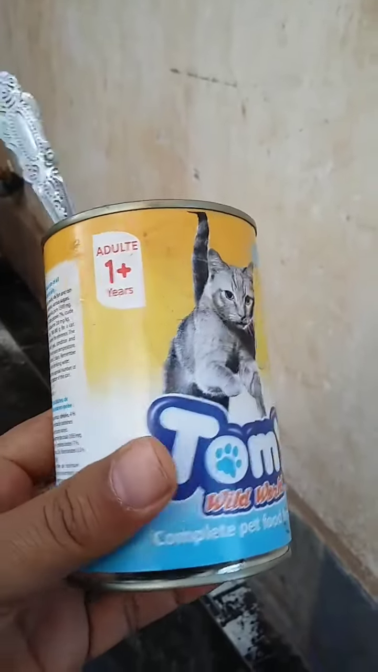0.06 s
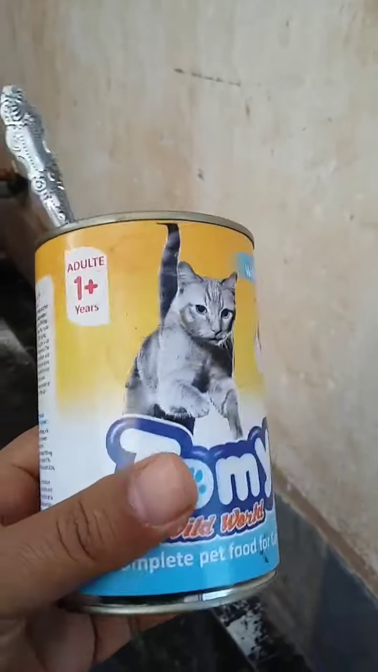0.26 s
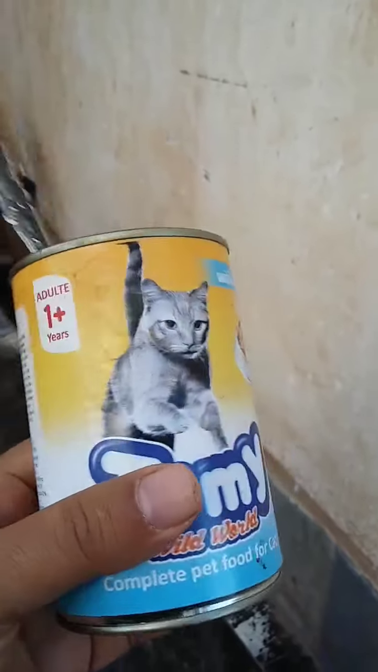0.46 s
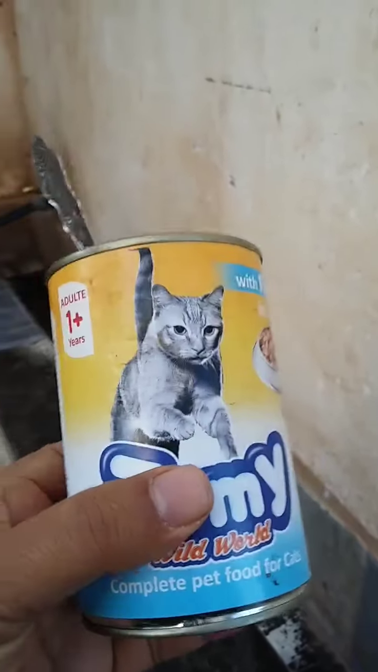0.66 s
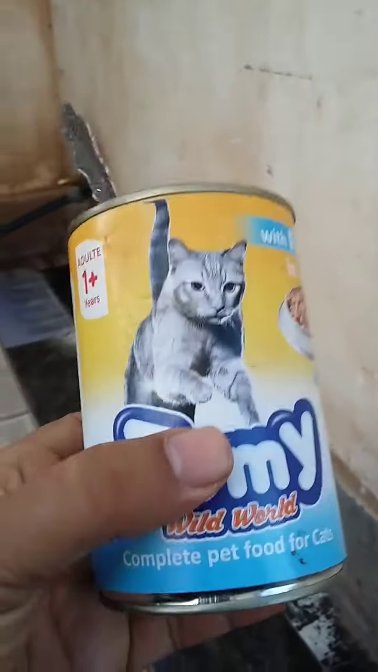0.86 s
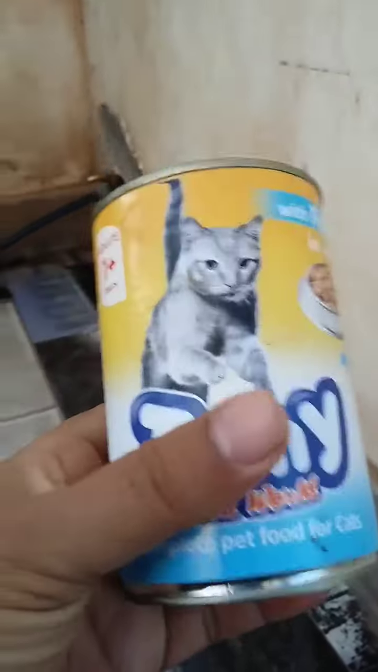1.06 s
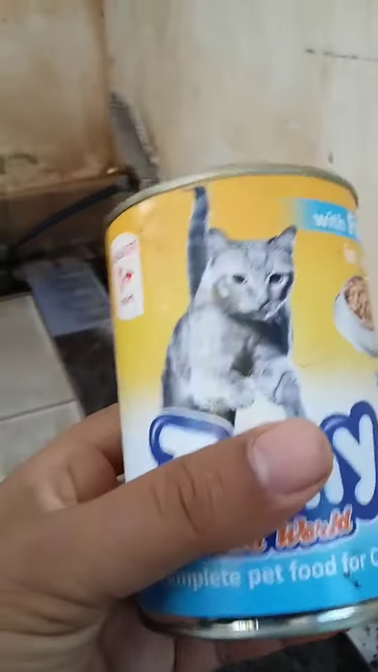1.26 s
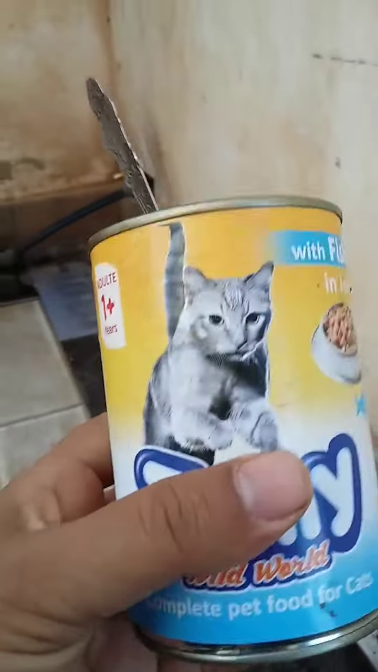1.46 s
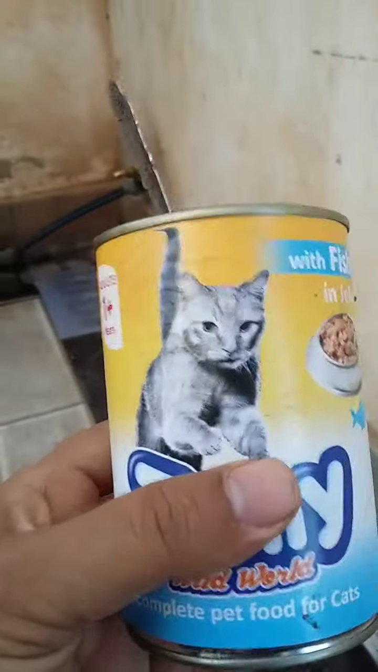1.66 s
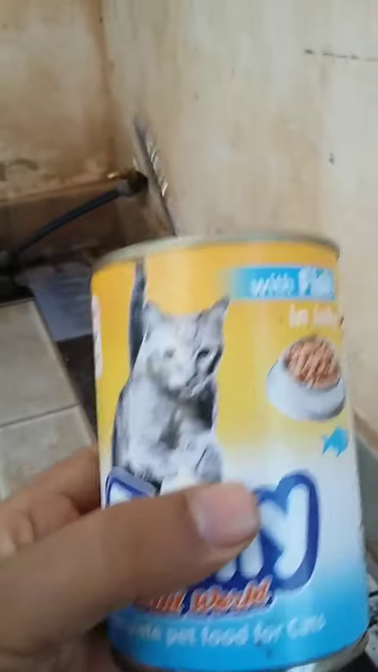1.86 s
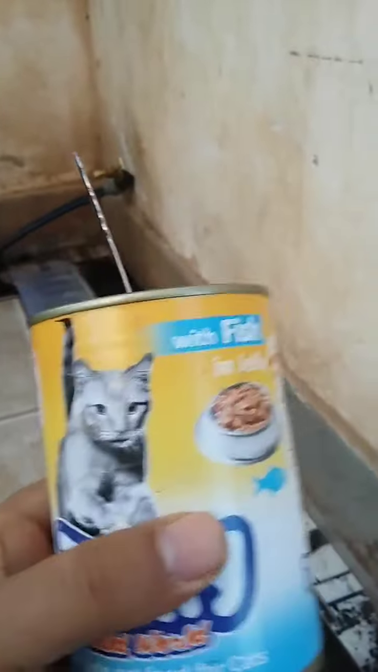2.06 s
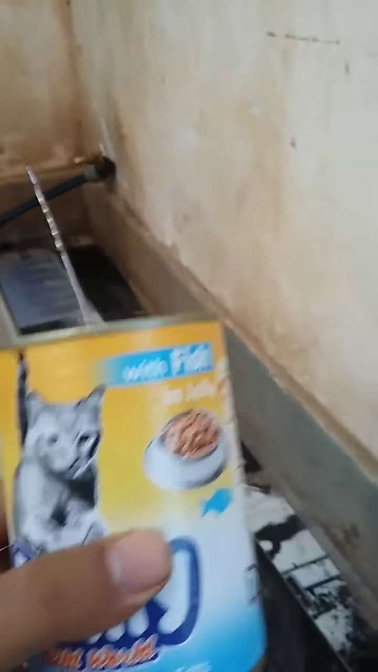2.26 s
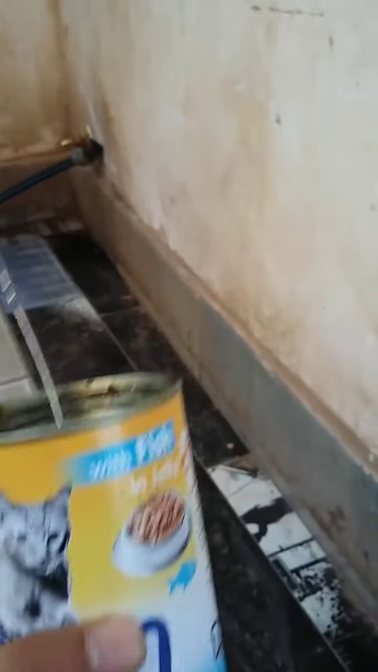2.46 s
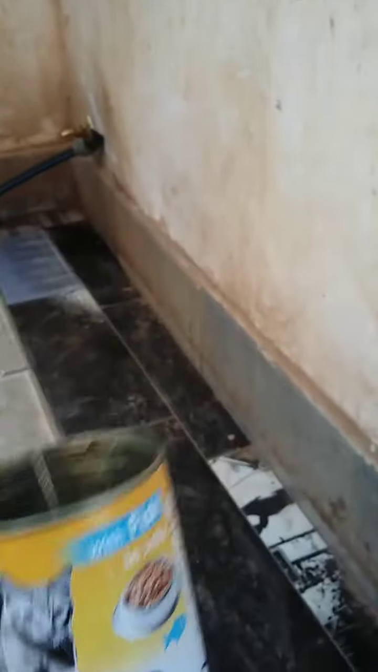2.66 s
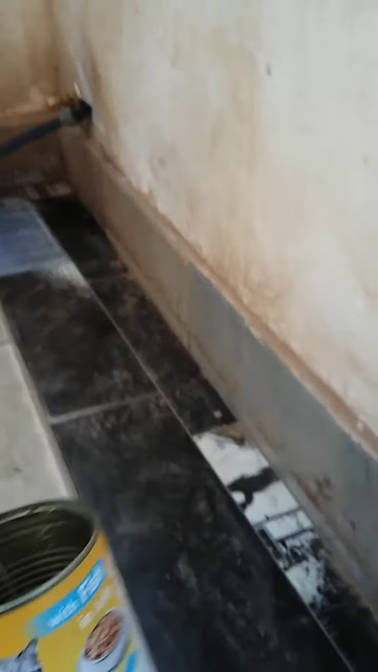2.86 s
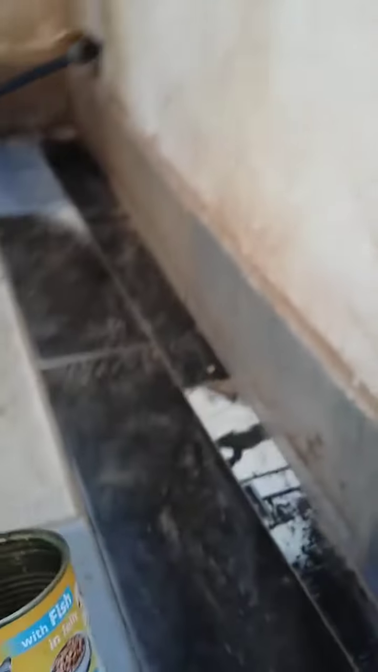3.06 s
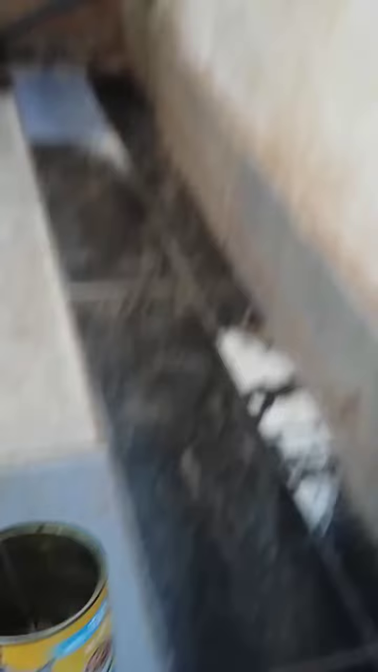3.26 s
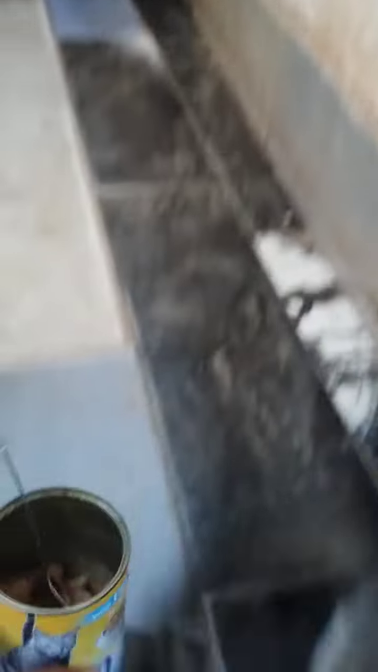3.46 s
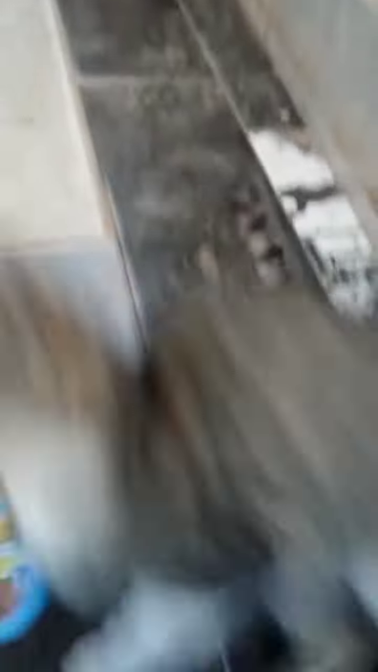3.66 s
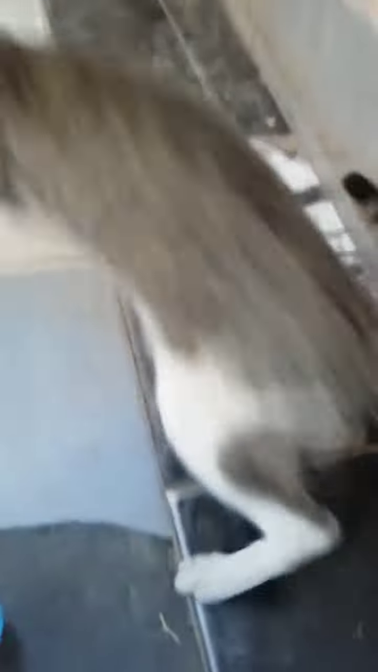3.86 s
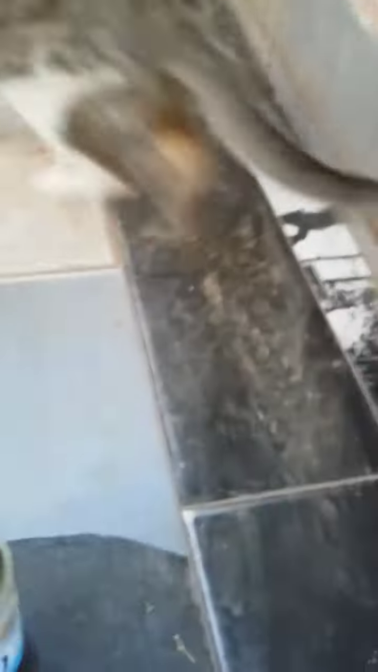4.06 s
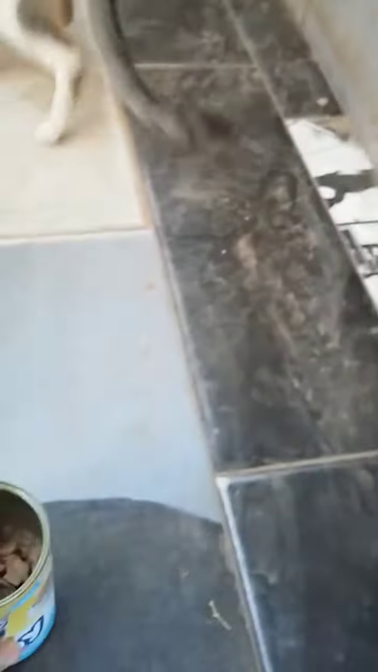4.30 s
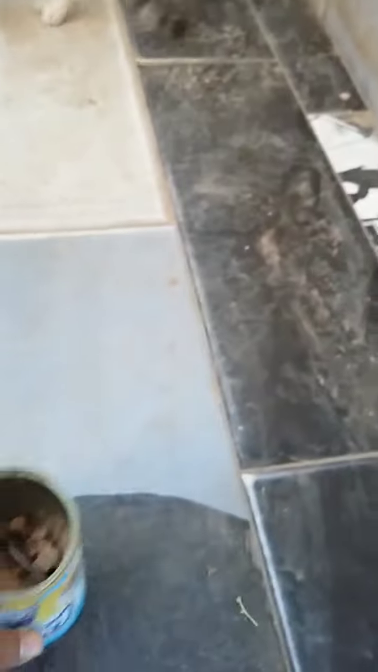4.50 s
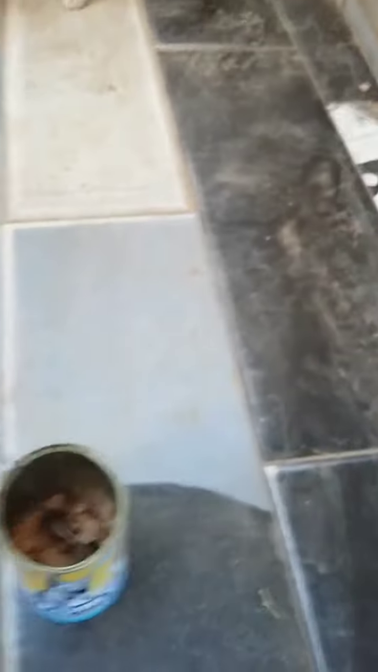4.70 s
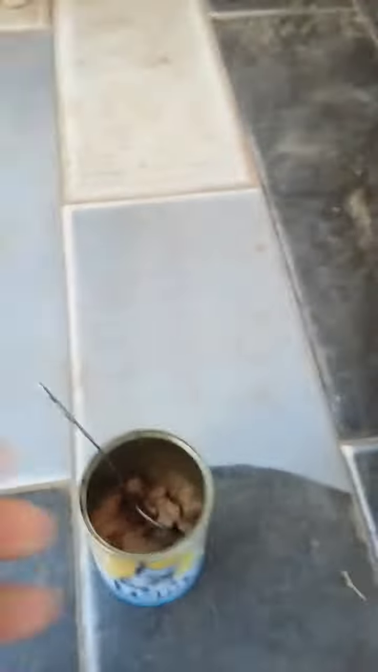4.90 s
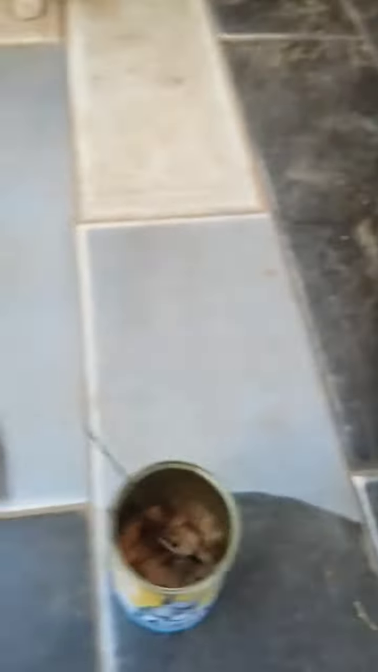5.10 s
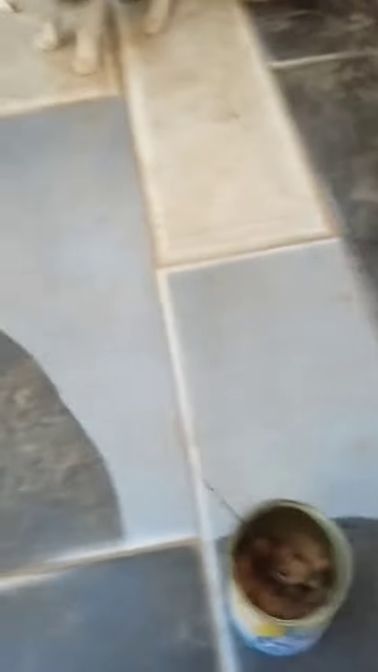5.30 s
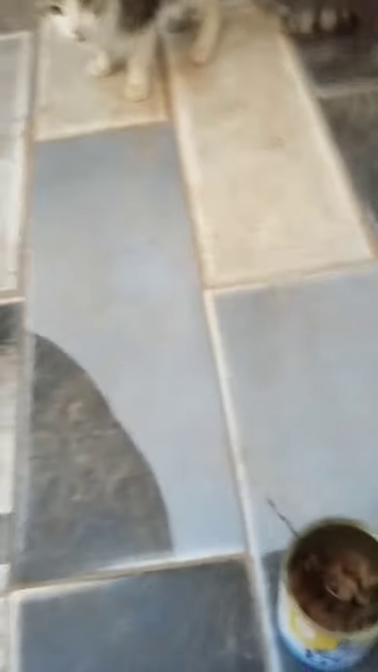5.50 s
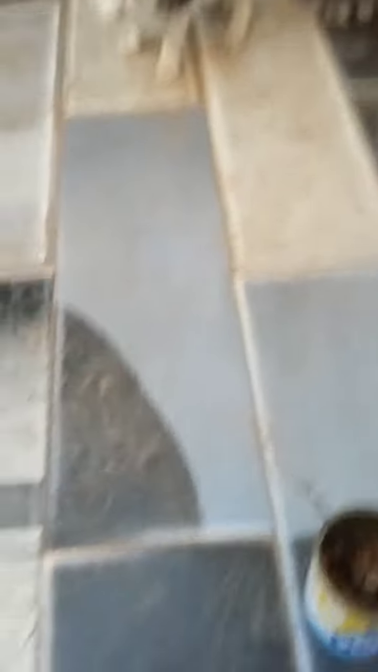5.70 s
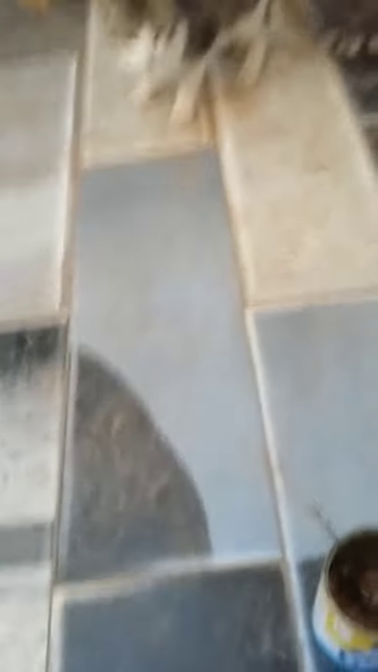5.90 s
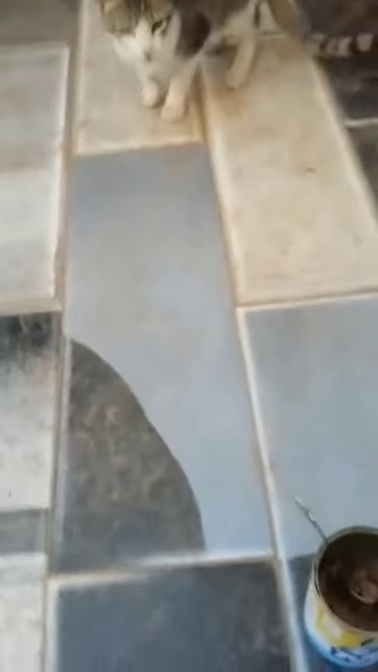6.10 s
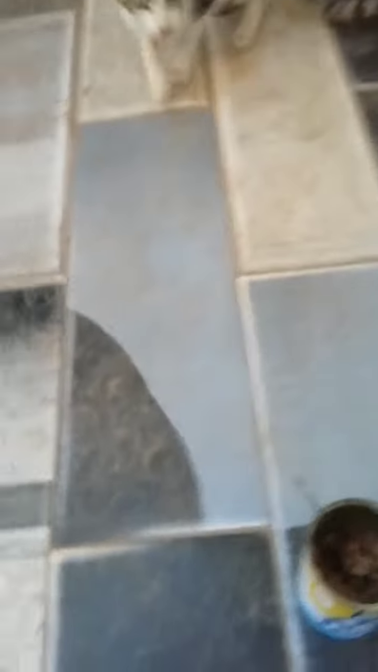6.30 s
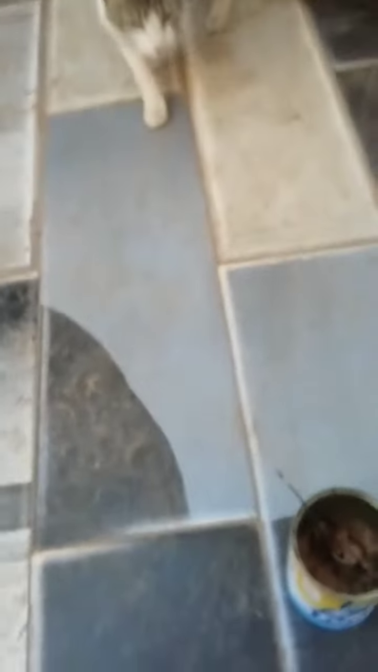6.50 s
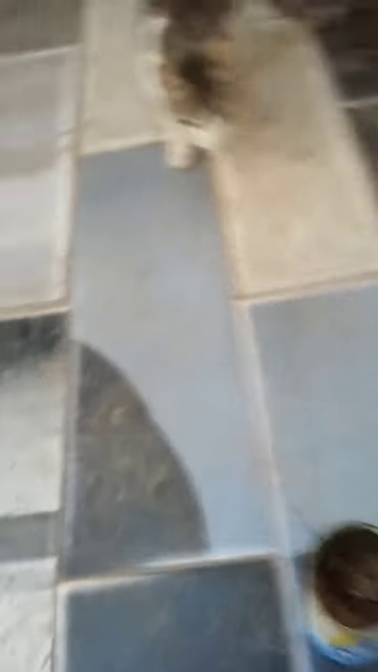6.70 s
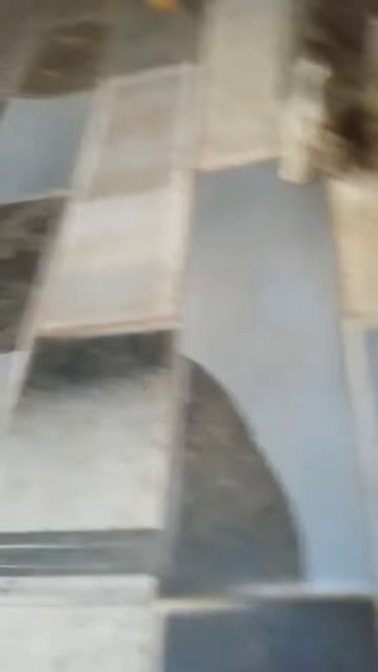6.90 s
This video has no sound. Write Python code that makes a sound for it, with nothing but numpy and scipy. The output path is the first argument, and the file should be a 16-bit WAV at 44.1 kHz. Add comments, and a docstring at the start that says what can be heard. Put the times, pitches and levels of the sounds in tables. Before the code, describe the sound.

Quiet yard ambience with distant chirps, one loud metallic can knock on tile, a short gritty slide, then soft shuffles and small close rustles.

```python
"""Far birds twitter over town noise and a low hum: gliding sines, coloured noise and noise-fed resonances.
A half-full tin can with a spoon in it is lowered onto a tiled floor in a hard-walled yard room, knocked and
slid: brief contacts and dense grit excite its damped modes, and feedback delays add the room.
Shuffling feet and paws surround it and finger rustles near the microphone follow: random clicks
through spectra."""
import sys
import numpy as np
from scipy import signal
from scipy.fft import rfft, irfft, next_fast_len
from scipy.io import wavfile

SR = 44100
rng = np.random.default_rng(int(sys.argv[2]) if len(sys.argv) > 2 else 0)


def waveform_to_disk(signal):
    """Save audio, clipped to [-1, 1], as 16-bit WAV at the path in sys.argv[1]."""
    frames = np.transpose(np.atleast_2d(signal))
    scaled = np.clip(frames, -1, 1) * 32767
    samples = np.round(scaled).astype(np.int16)
    wavfile.write(sys.argv[1], SR, samples)


N = 306439
T = np.arange(N) / SR   # time axis in seconds

# Levels of town noise and hum. Each row: time in seconds, noise in dB, hum in dB.
AMBIENCE_LEVELS = [(0.0, -53.5, -92), (0.68, -53.5, -66), (2.52, -54.5, -63.5), (3.91, -53, -52),
                   (5.79, -53.5, -60), (6.95, -51, -62)]
# Spectrum of the town noise. Each row: frequency in Hz, density in dB per Hz.
TOWN_SPECTRUM = [(19, -35), (32, -9.5), (95, 4.5), (173, -6), (299, -12), (826, -12.5), (2400, -22),
                 (3110, -21), (3930, -21.5), (5230, -40), (7330, -41.5), (7930, -48.5), (8570, -45.5),
                 (11400, -42.5), (16000, -58)]
# Narrow low resonances of the hum. Each row: frequency in Hz, width in Hz, level in dB.
HUM_RESONANCES = [(74.3, 0.98, -10.5), (164.7, 5, 0.5), (243, 9.8, -16.5), (492.6, 7.5, -14)]
# Likeness of the two channels. Each row: frequency in Hz, correlation from -1 to 1.
CHANNEL_LIKENESS = [(50, 1), (150, 0.92), (300, 0.72), (1000, 0.3), (3000, 0.012)]
# Balance of the two channels. Each row: frequency in Hz, left-right difference in dB.
CHANNEL_LEAN = [(60, -1.5), (380, -1), (2380, -2.5), (15000, 3.5)]
# Far bird notes. Each row: start in seconds, length in seconds, first pitch in Hz, last pitch in Hz,
# level in dB, pitch roughness in Hz.
BIRD_NOTES = [(0.03, 0.1, 3410, 3950, -67, 80), (0.175, 0.1, 2136, 1943, -60.5, 56),
              (0.235, 0.065, 2900, 3170, -64, 79), (0.325, 0.05, 3200, 3290, -65, 30),
              (0.382, 0.23, 1920, 2076, -65, 90), (0.513, 0.21, 2524, 2720, -68.5, 29),
              (0.76, 0.07, 4900, 5050, -70, 150), (0.765, 0.08, 4150, 3950, -63, 200),
              (0.78, 0.08, 3650, 3300, -65, 250), (1.064, 0.48, 1812, 1710, -67, 4.9),
              (1.125, 0.067, 3670, 3180, -64, 120), (1.226, 0.076, 3500, 3450, -69, 66),
              (1.363, 0.093, 3750, 2610, -62, 51), (1.478, 0.2, 2540, 3055, -66.5, 20),
              (1.829, .17, 4060, 4610, -67, 25), (2.008, 0.052, 4580, 4190, -65, 38),
              (2.245, 0.085, 3600, 3190, -59, 60), (2.395, 0.09, 3790, 3670, -58.5, 29),
              (2.6, 0.04, 3060, 2950, -60, 15), (2.65, .04, 3350, 3260, -65, 58),
              (2.785, .07, 3130, 2980, -58, 30), (2.96, 0.05, 4050, 4200, -65, 60),
              (3.055, 0.05, 3700, 3850, -64, 40), (3.245, .06, 3260, 3090, -57, 40),
              (4.16, 0.061, 4160, 4250, -59.5, 33), (6.848, 0.05, 780, 753, -57, 39)]
GLIDE_EASE, NOTE_ATTACK_SHARE, NOTE_RELEASE_S = 1.5, 0.044, 0.016   # glides start fast and settle
BIRD_ECHO_S, BIRD_ECHO_DB = 0.035, -12

# Close, thin rustles. Each row: time of the peak in seconds, peak of the envelope in dB, rise in seconds,
# decay in seconds.
RUSTLE_BURSTS = [(5.7184, -46.5, 0.0014, 0.019), (5.895, -50.5, 0.016, 0.016),
                 (5.997, -47.5, 0.0011, 0.0093), (6.04, -58.5, 0.09, 0.13), (6.165, -53.5, 0.011, 0.013),
                 (6.187, -38.5, 0.0011, 0.0019), (6.25, -54.5, 0.022, 0.027), (6.57, -59.5, 0.019, 0.044),
                 (6.79, -61, 0.077, 0.058)]
# Spectrum of the rustles. Each row: frequency in Hz, density in dB per Hz.
RUSTLE_SPECTRUM = [(1180, -45), (2000, -6.5), (4120, -3.5), (7980, -19.5), (12000, -16), (16000, -23)]
# Soles and paws dragging on the tiles, first a long faint stir. Each row: start in seconds, length in
# seconds, level in dB, swell to the end in dB, darkness from 0 to 1.
SHUFFLE_DRAGS = [(2.573, 4.23, -58.5, -2.5, 0.38), (3.071, 0.78, -56.5, 11, 0.75),
                 (4.358, 0.33, -51.5, 6.5, 0.86), (4.718, 0.12, -51.5, 8.5, 0.97),
                 (4.799, 0.26, -39.5, -9.5, 1), (5.04, 0.59, -49, -11, 0.93),
                 (5.718, 0.19, -50.5, -1, 0.92), (5.932, 0.026, -51.5, 1, 0.23), (6.2, 0.063, -56, 3, 0),
                 (6.763, 0.025, -39.5, -14, 1)]
# Spectra of a bright and a dark sole. Each row: frequency in Hz, density in dB per Hz.
BRIGHT_SOLE_SPECTRUM = [(290, 13), (500, 6), (1730, -16), (4220, 6.5), (6060, -26), (14000, -24.5)]
DARK_SOLE_SPECTRUM = [(240, -45), (400, -12), (950, -8.5), (1500, -11.5), (2050, -10), (2940, -6.5),
                      (4200, -15), (14000, -56.5)]
DRAG_ATTACK_SHARE, DRAG_RELEASE_S = 0.28, 0.025
# Short ticks of claws, grit, fingers and the can's bright clicks (4.40 and 4.57 s). Each row: start in
# seconds, peak in dB before panning, lowest frequency in Hz, highest frequency in Hz, left-right
# difference in dB.
SHORT_TICKS = [(0.476, -43, 2150, 3700, -9), (2.215, -47, 2000, 3600, -6), (2.8, -48, 2000, 3000, -5),
               (2.884, -47, 1900, 3300, -1), (4.4015, -35, 4400, 5150, -6), (4.57, -33, 3600, 5240, -12),
               (6.1851, -23.5, 125, 3330, -24), (6.205, -39, 2500, 5030, 6), (6.5274, -34, 1840, 4400, 9),
               (6.775, -46, 2200, 3630, -23)]
TICK_DECAY_S = 0.0042

# Low thuds on the floor. Each row: start in seconds, drive level in dB, hardness as the highest Hz of the push.
FLOOR_THUDS = [(3.7106, -27.5, 340), (3.7762, -23.5, 1500), (6.17, -39, 493), (6.699, -38.5, 1010),
               (6.755, -42, 696), (6.778, -40, 300)]
# The can's modes as it slides. Each row: frequency in Hz, width in Hz, level in dB.
SLIDING_CAN_MODES = [(963, 69, 18.5), (1890, 70, 12), (2730, 94, 0), (2950, 98, 7), (4080, 57, 16),
                     (4610, 35, 18), (4850, 48, 19.5), (5030, 44, 9)]
# Spectrum of the grit heard directly. Each row: frequency in Hz, density in dB per Hz.
SLIDE_GRIT_SPECTRUM = [(180, -43), (300, -33), (915, -8), (3030, 7), (3580, -20), (4750, -2.5),
                       (16000, -17.5)]
SLIDE_S, SLIDE_FASTEST_S, SLIDE_STOP_S, SLIDE_DB = 4.545, 4.645, 4.715, -35   # slid once over the tiles
SLIDE_GRIT_DB, GRIT_STEEPNESS = -5, 0.77   # direct grit against the modes; it grows faster with speed
RIM_BITES_S, RIM_LENGTH_S, RIM_EDGE_S = 4.586, 0.095, 0.014   # while the rim bites, the modes ring
# Blows on the can. Each row: start in seconds, peak in dB, damping by grip and floor as a divisor of the
# decay times, tilt toward the high modes in dB per octave, rattle in dB against the contact click,
# left-right difference in dB, factor on the mode frequencies, highest frequency in Hz.
CAN_BLOWS = [(3.7746, -2, 1.2, 11.5, -35, -4.5, 1.0, 7200), (3.7865, -14, 1.3, 4, -28, -12, 1.0, 6500),
             (4.3988, -11.5, 6.5, -9, -45, -6.5, 0.918, 2800), (4.4028, -22, 5, -12, -40, -6.5, 0.9, 2000)]
# The can's modes before damping, tilt and pitch factor. Each row: frequency in Hz, level in dB,
# 60 dB decay time in seconds, left-right difference in dB.
CAN_MODES = [(746, -16.5, 0.022, 2.5), (1090, -13, 0.047, -1), (1350, -7.5, 0.056, 7),
             (1464, 0.5, 0.0097, -3), (2200, -8, 0.0049, 5), (2660, 1, 0.014, -8), (2772, 1, 0.04, -7),
             (3000, 1, 0.014, -10), (3280, 4, 0.01, -12), (3460, -3, 0.02, -5), (3750, -13, 0.0044, -18),
             (4620, -21, 0.014, 27), (4930, -18, 0.0067, -20.5), (5700, -28, 0.015, 3),
             (7100, -28, 0.0063, 7)]
RATTLE_DIRECT_DB = 19   # the rattle is also heard directly, as a broad crackle

ROOM_T60_S, WALL_CUT_HZ = 0.33, 17000
CUTOFF_HZ = 16300


def amp(db):
    """A level in dB is twenty times the logarithm of the amplitude ratio."""
    return 10 ** (np.asarray(db) / 20)


def rms_one(x):
    """Dividing by the root mean square gives unit effective amplitude."""
    return x / np.sqrt(np.mean(x ** 2) + 1e-20)


def in_time(rows):
    """Levels between tabulated times follow by linear interpolation, column by column."""
    s, *columns = np.transpose(rows)
    return [np.interp(T, s, c) for c in columns]


def at_hz(points, hz):
    """A spectrum is interpolated on a logarithmic frequency axis, as the ear spaces pitch."""
    point_hz, values = np.array(points)[:, 0], np.array(points)[:, 1]
    return np.interp(np.log(hz), np.log(np.maximum(point_hz, 1)), values)


def sides(pan_db):
    """A level difference between the ears, split evenly, shifts the sound to one side."""
    return amp(np.array([[pan_db / 2], [-pan_db / 2]]))


def add(out, s, sound):
    """Superposition: a short sound is summed in at its start time."""
    at = round(s * SR)
    out[:, at:at + sound.shape[1]] += sound[:, :N - at]


def stroke(s, length_s, attack_s, release_s, t=None):
    """Amplitude envelope: sine-squared attack, hold to the end of the length, exponential release."""
    t = T if t is None else t
    rise = np.sin(np.pi / 2 * np.clip((t - s) / attack_s, 0, 1)) ** 2
    return rise * np.exp(-np.maximum(t - s - length_s, 0) / release_s)


def drift(rate):
    """White noise through two equal low-pass poles, at rate in Hz, is a slow random wander of rms 1."""
    # made at one value per 40 samples, with the filter's start dropped
    r = np.exp(-80 * np.pi * rate / SR)
    slow = signal.lfilter([1], [1, -2 * r, r * r], rng.standard_normal(N // 40 + 2002))[2000:]
    return np.interp(np.arange(N) / 40, np.arange(len(slow)), rms_one(slow))


def ring(clicks, hz, t60):
    """Impulse response of a damped mode: a unit click starts a decaying sine of height 1."""
    r, w = amp(-60 / (t60 * SR)), 2 * np.pi * hz / SR
    return signal.lfilter([0, np.sin(w)], [1, -2 * r * np.cos(w), r * r], clicks + 1e-18)


def resonance(x, hz, width_hz):
    """Bandwidth and decay time are inversely related in a resonance; scaled to rms 1."""
    return rms_one(ring(x, hz, np.log(1000) / np.pi / width_hz))


def grit(per_s, spread_db):
    """Granular contact: two unrelated streams of random clicks of uneven size; rms 1."""
    sizes = amp(spread_db * np.minimum(rng.exponential(1, (2, N)), 5)) * rng.choice([-1, 1], (2, N))
    return rms_one(sizes * (rng.random((2, N)) < per_s / SR))


def coloured(source, spectrum, alike=None, patchy_db=0.):
    """Spectral shaping with a set interaural correlation by band; rms 1 before any patchiness."""
    hz = np.maximum(np.fft.rfftfreq(N, 1 / SR), 1)
    alike = np.clip(at_hz(CHANNEL_LIKENESS, hz) if alike is None else alike, -1, 1)
    opposite = np.array([[1], [-1]])
    mid, side = rfft(source) * amp(at_hz(spectrum, hz))
    pair = np.sqrt(1 + alike) * mid + np.sqrt(1 - alike) * side * opposite
    pair = pair * amp(at_hz(CHANNEL_LEAN, hz) / 2 * opposite)
    return rms_one(irfft(pair, N)) * amp(patchy_db * drift(13.0))


def ambience():
    """Broadband far noise, and a hum as noise selected by a few narrow low resonances."""
    noise_db, hum_db = in_time(AMBIENCE_LEVELS)
    town = coloured(rng.standard_normal((2, N)), TOWN_SPECTRUM, patchy_db=0.6)
    white = rng.standard_normal(N)
    hum = sum(amp(db) * resonance(white, hz, width) for hz, width, db in HUM_RESONANCES)
    return amp(noise_db) * town + amp(hum_db) * hum * sides(0.47)


def birds():
    """Frequency-modulated near sines, some hoarse, doubled by reflection from a far wall."""
    out, hoarse = np.zeros((1, N)), drift(160)
    for s, length_s, first_hz, last_hz, level_db, rough_hz in BIRD_NOTES:
        start, stop = round(s * SR), round((s + length_s + 6 * NOTE_RELEASE_S) * SR)
        t = T[start:stop]
        remaining = 1 - np.clip((t - s) / length_s, 0, 1)
        glide = last_hz + (first_hz - last_hz) * remaining ** GLIDE_EASE
        pitch = glide + rough_hz * hoarse[start:][:len(t)]
        note = stroke(s, length_s, NOTE_ATTACK_SHARE * length_s, NOTE_RELEASE_S, t)
        add(out, s, amp(level_db) * note[None] * np.sin(2 * np.pi * np.cumsum(pitch) / SR))
    add(out, BIRD_ECHO_S, amp(BIRD_ECHO_DB) * out.copy())
    # the level wavers differently at each ear, as far sounds do; the right ear lags two samples
    left = out[0] * amp(3 * drift(35))
    right = np.roll(out[0], 2) * amp(3 * drift(35))
    return np.array([left, right])


def rustles():
    """Fine crackle close by, as dense random clicks under bell-shaped envelopes."""
    level = np.zeros(N)
    for s, db, rise_s, decay_s in RUSTLE_BURSTS:
        spread_s = np.where(T < s, rise_s, decay_s)
        level += amp(db) * np.exp(-((T - s) / spread_s) ** 2)
    return level * coloured(grit(per_s=25000, spread_db=3.0), RUSTLE_SPECTRUM, alike=0.05)


def shuffle():
    """Sliding friction as fine random clicks; each drag mixes a bright and a dark sole by power."""
    bright = coloured(grit(per_s=9400, spread_db=4.5), BRIGHT_SOLE_SPECTRUM, alike=0.22, patchy_db=2.0)
    dull = coloured(grit(per_s=6600, spread_db=2.0), DARK_SOLE_SPECTRUM, alike=0.031, patchy_db=1.6)
    power = np.zeros((2, N))
    for s, length_s, level_db, swell_db, dark in SHUFFLE_DRAGS:
        swelling = amp(level_db + swell_db * np.clip((T - s) / length_s, 0, 1))
        level = swelling * stroke(s, length_s, DRAG_ATTACK_SHARE * length_s, DRAG_RELEASE_S)
        power += np.clip([[1 - dark], [dark]], 0, 1) * level ** 2
    return sides(-2.4) * (np.sqrt(power[0]) * bright + np.sqrt(power[1]) * dull)


def ticks():
    """Impulsive contact: a click and a puff of noise that dies at once, limited to a band."""
    out, tail = np.zeros((2, N)), np.arange(SR // 10) / SR
    for s, peak_db, low_hz, top_hz, pan_db in SHORT_TICKS:
        noise = np.diff(rng.standard_normal((2, len(tail) + 1)))   # differencing brightens it
        puff = 0.07 * noise * np.exp(-tail / TICK_DECAY_S) + (tail == 0)
        band = signal.butter(3, [low_hz, top_hz], "band", fs=SR, output="sos")
        tick = signal.sosfilt(band, puff)
        add(out, s, amp(peak_db) * sides(pan_db) * tick / np.abs(tick).max())
    return out


def thuds():
    """Weight landing: a harder push holds higher frequencies and so excites more of four low floor modes."""
    out, click = np.zeros((1, N)), 1e-18 + (np.arange(SR // 4) == 0)
    for s, db, top_hz in FLOOR_THUDS:
        push = signal.sosfilt(signal.butter(2, top_hz, fs=SR, output="sos"), click)
        floor = amp(-7.5) * ring(push, 172.5, 0.088) + amp(-14.5) * ring(push, 227.5, 0.2)
        floor = floor + ring(push, 300, 0.0087) - amp(2.0) * ring(push, 793, 0.017)
        add(out, s, amp(db) * floor[None])
    return out


def slide():
    """Friction excitation: the bottom rim skips over grit, heard directly and through the can's damped modes."""
    grains = grit(per_s=6500, spread_db=0.5)
    # each mode swells on its own
    body = sum(amp(db + 2.8 * drift(30)) * resonance(grains, hz, width) for hz, width, db in SLIDING_CAN_MODES)
    direct = coloured(grains, SLIDE_GRIT_SPECTRUM, alike=0.14)
    phase = np.interp(T, [SLIDE_S, SLIDE_FASTEST_S, SLIDE_STOP_S], [0, np.pi / 2, np.pi])
    speed = np.sin(phase) ** 2
    bite = stroke(RIM_BITES_S, RIM_LENGTH_S, RIM_EDGE_S, RIM_EDGE_S)
    ringing = bite * np.sqrt(speed) * rms_one(body)
    scraping = amp(SLIDE_GRIT_DB) * speed ** GRIT_STEEPNESS * direct
    return amp(SLIDE_DB) * (ringing + scraping)


def knocks():
    """Modal excitation: a brief contact and the spoon's rattle drive every mode; each beams its own way."""
    out, tail = np.zeros((2, N)), np.arange(SR // 4) / SR
    for s, peak_db, damping, tilt_db, rattle_db, pan_db, pitch, top_hz in CAN_BLOWS:
        noise = rng.standard_normal(len(tail)) + 0.5 * rng.standard_normal((2, len(tail)))
        rattle = amp(rattle_db) * np.exp(-tail / 0.02) * noise
        contact = (tail == 0) + 0.2 * np.exp(-tail / 0.001) * noise + rattle
        body = np.zeros((2, len(tail)))
        for k, (hz, db, t60, lean_db) in enumerate(CAN_MODES):
            level = (-1) ** k * amp(db + tilt_db * np.log2(hz / 2800))   # neighbours alternate in sign
            body += level * sides(lean_db) * ring(contact, pitch * hz, t60 / damping)
        direct = amp(tilt_db - 12.0) * (contact + amp(RATTLE_DIRECT_DB) * rattle)
        band = signal.butter(5, [250, top_hz], "band", fs=SR, output="sos")
        blow = sides(pan_db) * signal.sosfilt(band, body + direct)
        add(out, s, amp(peak_db) * blow / np.abs(blow).max())
    return out


def room(x):
    """Reverberation by recirculation: eight feedback delays a side, duller on every round."""
    size = next_fast_len(N + SR)
    cycles = np.fft.rfftfreq(size)
    z = np.exp(-2j * np.pi * cycles)   # delay of one sample
    dull = np.exp(-2 * np.pi * WALL_CUT_HZ / SR)
    wall, out = (1 - dull) / (1 - dull * z), np.zeros((2, len(z)), complex)
    for k, lag in enumerate((rng.uniform(0.009, 0.042, 16) * SR).astype(int)):
        loop = amp(-60 * lag / SR / ROOM_T60_S) * wall * np.exp(-2j * np.pi * cycles * lag)
        out[k % 2] += loop / (1 - loop) * (-1) ** (k // 2)
    return irfft(out * rfft(x, size), size)[:, :N]


def scene():
    """Superposition of all sources, with reverberation fed by the can, ticks, thuds and birds."""
    far = birds()
    near = ticks() + thuds() + slide() + knocks()
    wet = amp(-27) * near.mean(0) + amp(-11) * far.mean(0)
    return ambience() + far + rustles() + shuffle() + near + room(wet)


def record(dry):
    """Band limits of the pickup: the microphones drop the deepest bass, and the top is cut."""
    dry = signal.sosfilt(signal.butter(3, 42, "high", fs=SR, output="sos"), dry)
    return signal.sosfilt(signal.cheby2(14, 80, CUTOFF_HZ, fs=SR, output="sos"), dry)


dry = scene()
out = record(dry)
waveform_to_disk(out)
```